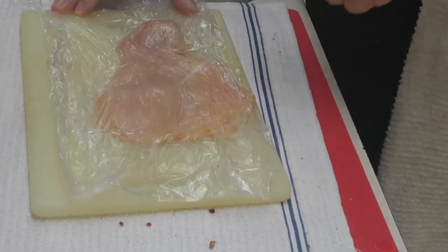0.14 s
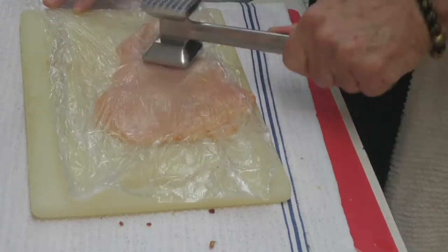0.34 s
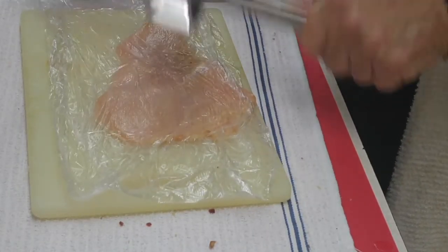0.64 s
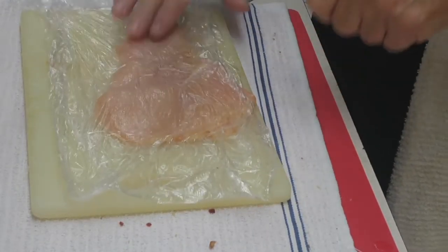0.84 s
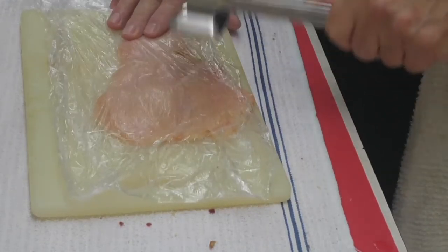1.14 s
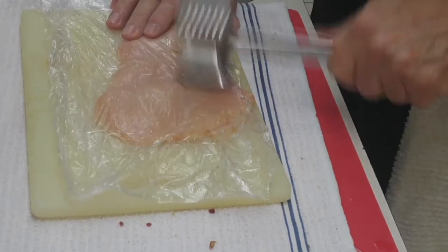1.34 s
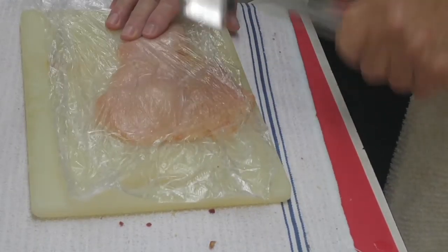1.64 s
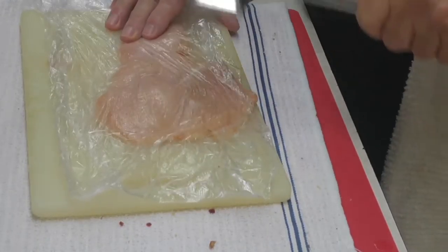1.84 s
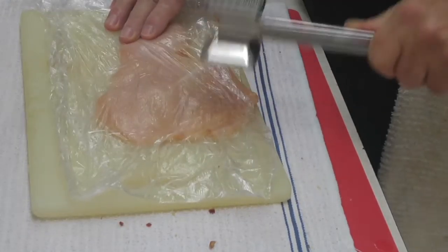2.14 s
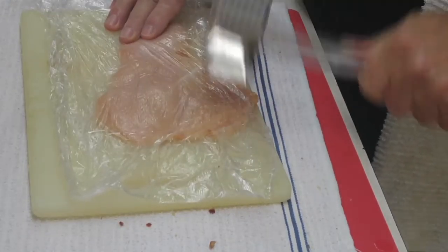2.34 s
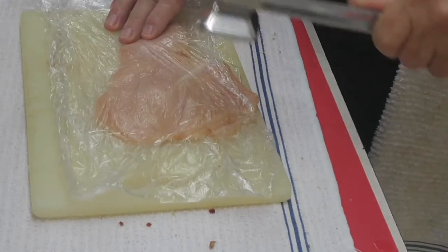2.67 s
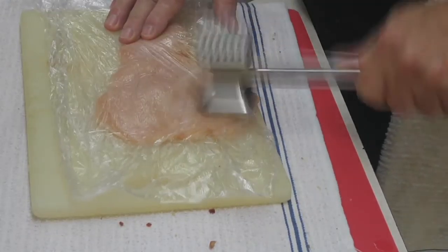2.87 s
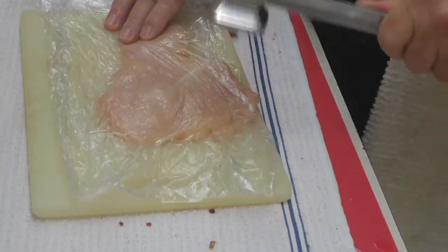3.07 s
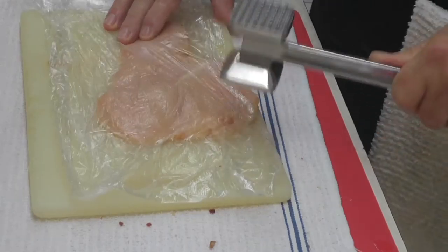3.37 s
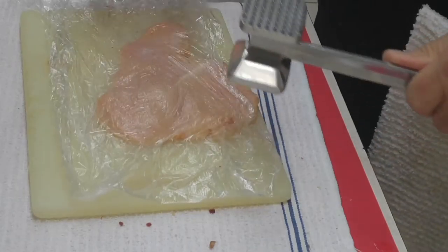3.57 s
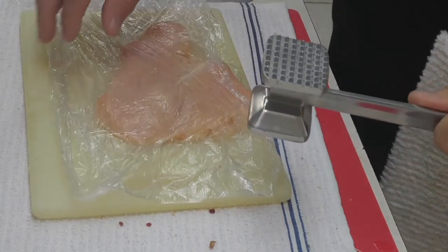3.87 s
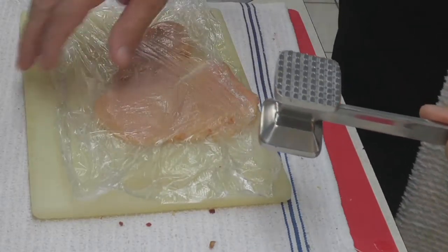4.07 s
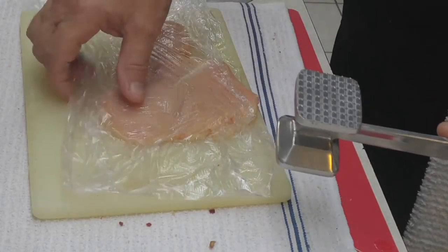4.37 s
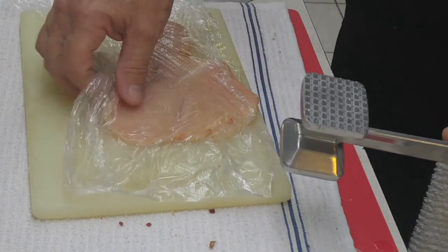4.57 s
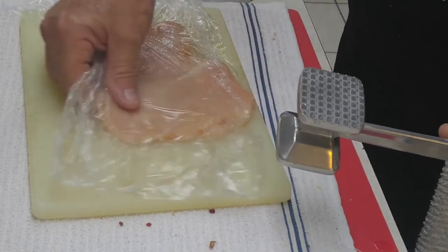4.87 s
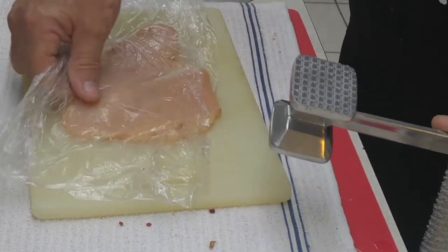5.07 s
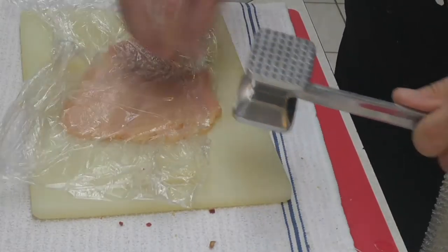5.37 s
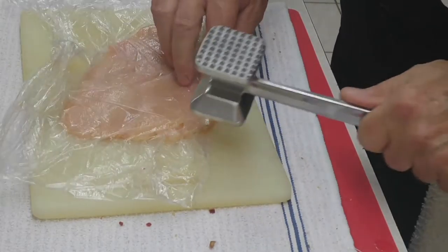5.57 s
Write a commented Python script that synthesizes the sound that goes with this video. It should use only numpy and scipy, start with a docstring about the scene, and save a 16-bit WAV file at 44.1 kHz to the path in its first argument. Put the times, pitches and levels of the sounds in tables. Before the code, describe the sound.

Close, dry-ish small-kitchen sound with a faint steady hush. The tail of an earlier blow and a soft film rustle open it. A metal mallet then hits meat under plastic film at about 0.25 and 0.6 s: loud wet slaps with a short, dull cutting-board thump. From 1.0 to 3.5 s blows continue every 0.35 s or so, softer and varied, some thin and bright, the one at 2.8 s barely a tap. Each slap leaves a sprinkle of fine ticks, and a small crackle follows about 0.08 s later as the film peels off the mallet. A fuller, hollower smack comes at 3.85 s, faint film rustle around 4.2 s, then the hardest crack at 4.23 s, limited and slightly clipped, its short tail swelling. A tiny squeak precedes a lighter blow at 4.6 s, another follows at 4.95 s, a second hard smack at 5.3 s, and a light last hit at 5.65 s.

```python
"""Pounding meat under film

A metal mallet pounds a chicken breast under plastic film on a cutting board, in a small kitchen.
Each blow is a wet slap of shaped noise, with the thump of the board as a sum of damped modes.
Sparse random ticks make the film spatter after a slap and crackle as the mallet lifts off.
Band-wise decaying noise is the room; the recorder's limiter ducks the hardest slaps, so their tail swells."""
import sys
import numpy as np
from scipy import signal
from scipy.fft import rfft, irfft
from scipy.io import wavfile
from scipy.ndimage import uniform_filter1d

SR = 44100
rng = np.random.default_rng(int(sys.argv[2]) if len(sys.argv) > 2 else 0)


def generate_wav(signal):
    """Clip the signal to [-1, 1] and save it as 16-bit WAV at the path in sys.argv[1]."""
    frames = np.transpose(np.atleast_2d(signal))
    scaled = np.clip(frames, -1, 1) * 32767
    pcm = np.round(scaled).astype(np.int16)
    wavfile.write(sys.argv[1], SR, pcm)


N = 251987
LEAD = SR // 4   # samples computed ahead of the start, so that earlier sound can ring on
SPAN = N + LEAD
TIME = (np.arange(SPAN) - LEAD) / SR
THIRDS = 250 * 2 ** (np.arange(19) / 3)   # third-octave band centres [Hz]

# mallet blows, levels relative: (time [s], slap level [dB], slap tilt [dB per octave],
# air pocket frequency [Hz], air pocket boost [dB], thump level [dB],
# time the head rests on the meat [s], lift-off crackle level [dB])
MALLET_BLOWS = [(-.11, 4, -3.5, 1020, -3, -1.5, 0.096, -28.5), (.248, 4.5, 0, 1100, 7, 2, 0.076, -20),
                (0.5976, 7.5, -2.5, 7000, 7, 3.5, 0.076, -17.5),
                (0.9818, -10.5, 4, 1600, 7.5, -2, 0.081, -30.5),
                (1.342, -10.5, .5, 2030, 1, -9.5, .089, -26), (1.7331, -6, 0, 3510, 5.5, -1.5, 0.088, -26),
                (2.0947, -6, 0, 3400, 6, -2, .092, -14.5), (2.4646, -4, -2, 4340, 7, -2.5, 0.095, -17.5),
                (2.7902, -16, 0.5, 3225, 4.5, -8, 0.086, -35),
                (3.1665, -8.5, -0.75, 6800, 8.5, 2.5, .089, -24), (3.5281, -4, 0, 1900, 2, 0.5, .079, -25),
                (3.8623, 2.5, -0.7, 900, 7, 5.5, .098, -36.5),
                (4.233, 19, -1.67, 2374, 7.5, 8.5, 0.073, -19),
                (4.5913, -0.5, -0.5, 4900, 12, -3.5, 0.08, -26.5),
                (4.9593, -2.5, 1.5, 1184, 4.5, -0.5, .085, -20), (5.297, 14, -.5, 5000, 4, 6, .082, -19.5),
                (5.6481, -5.5, 2.5, 747, 4.5, 1.5, .08, -30.5)]


def from_db(db):
    """A level in decibels is a logarithm of amplitude; this inverts it to a gain."""
    return 10 ** (np.asarray(db) / 20)


def unit(x):
    """Energy is the sum of squares; each row is normalized to an energy of one."""
    return x / np.sqrt(np.sum(x ** 2, axis=-1, keepdims=True) + 1e-20)


def at_hz(points, hz):
    """A spectrum is interpolated linearly along a logarithmic frequency axis."""
    points = np.array(points)
    return np.interp(np.log(hz), np.log(points[:, 0]), points[:, 1])


def third(x, hz):
    """Band-pass filtering isolates one third octave around its centre frequency."""
    half = 2 ** (1 / 6)
    sos = signal.butter(2, [hz / half, hz * half], "band", fs=SR, output="sos")
    return signal.sosfilt(sos, x + 1e-18)


def place(times, sounds):
    """Superposition: short sounds add linearly on the common time line."""
    out = np.zeros(SPAN + SR)
    for s, sound in zip(times, sounds):
        start = max(round(s * SR) + LEAD, 0)
        out[start:start + len(sound)] += sound
    return out[:SPAN]


def steady_noise(colour):
    """Spectral shaping: white noise weighted in frequency becomes coloured noise of rms one."""
    hz = np.maximum(np.fft.rfftfreq(SPAN, 1 / SR), 1)
    spectrum = rfft(rng.standard_normal(SPAN)) * from_db(at_hz(colour, hz))
    return np.sqrt(SPAN) * unit(irfft(spectrum, SPAN))


def ring(force, hz, t60):
    """Damped resonance: a two-pole mode answers a unit click with a decaying sine."""
    r = from_db(-60 / (t60 * SR))   # amplitude kept per sample
    w = 2 * np.pi * hz / SR
    return signal.lfilter([0, np.sin(w)], [1, -2 * r * np.cos(w), r * r], force + 1e-18)


def room_tone(level_db=-63):
    """Stationary noise: the room's hush has a fixed spectrum and a constant mean power."""
    # hush colour: (frequency [Hz], relative level [dB per Hz])
    hush_colour = [(30, 5.5), (60, 16), (110, -2.5), (320, -2), (500, -2.5), (780, 0.5), (1600, -10.5),
                   (3000, -11), (6000, -16.5), (10000, -17.5), (15500, -20)]
    return from_db(level_db) * steady_noise(hush_colour)


def rustles(swell_s=0.015, fade_s=0.031):
    """Amplitude modulation: handled film is noise that swells and fades exponentially at each peak."""
    # rustle colour: (frequency [Hz], relative level [dB per Hz])
    rustle_colour = [(290, -47.5), (500, -4.5), (739, 3), (1440, -2.5), (1640, 0), (2820, 0), (4460, -5.5),
                     (6780, -17), (14000, -39.5)]
    # film handled between blows: (time of the peak [s], level [dB])
    rustle_peaks = [(0.109, -42), (.165, -53), (.225, -50.5), (0.556, -50.5), (2.349, -59.5), (4.101, -57),
                    (4.21, -49.5)]
    envelope = 0
    for s, db in rustle_peaks:
        time_constant = np.where(TIME < s, swell_s, fade_s)
        envelope = envelope + from_db(db) * np.exp(-np.abs(TIME - s) / time_constant)
    return envelope * steady_noise(rustle_colour)


def kitchen(x, near_db=-5.5, near_t60=.085, build_s=0.0009):
    """Diffuse reverberation: each band's energy is stored and returned as exponentially decaying noise."""
    # decay of the tail: (frequency [Hz], T60 [s])
    tail_t60 = [(100, 0.81), (300, 0.25), (800, .32), (2000, 0.3), (5000, 0.29), (13000, 0.37)]
    # strength of the tail against the direct sound: (frequency [Hz], level [dB])
    tail_level = [(100, -29), (400, -8), (850, -9), (2000, -10), (5000, -8.5), (8000, -16.5),
                  (13000, -20.5)]

    def store(power, seconds):
        """First-order energy balance: a leaky store fills and empties with one time constant."""
        r = np.exp(-1 / (seconds * SR))
        return signal.lfilter([1 - r], [1, -r], power)

    white = rng.standard_normal((2, SPAN))
    bands = np.concatenate([THIRDS[2:6] / 4, THIRDS])   # four more below 250 Hz
    out = 0
    for k, hz in enumerate(bands):
        power = third(x, hz) ** 2
        # ln(1e6) turns a 60 dB decay time into an energy time constant
        cupboards = store(power, near_t60 / np.log(1e6)) * from_db(near_db) ** 2
        tail = store(power, at_hz(tail_t60, hz) / np.log(1e6)) * from_db(at_hz(tail_level, hz)) ** 2
        envelope = np.sqrt(SPAN * store(cupboards + tail, build_s))
        out = out + envelope * unit(third(white[k % 2], hz))
    return out


def squeaks():
    """Narrow-band resonance: stretched film slips under the fingers and sings briefly around one pitch."""
    # squeaks: (time of the peak [s], time from peak to 1/e [s], frequency [Hz], level [dB])
    film_squeaks = [(4.15, 0.086, 8980, -69.5), (4.205, .028, 2900, -57), (4.572, .002, 3800, -37.5)]
    out = 0
    for s, length, hz, db in film_squeaks:
        resonance = ring(rng.standard_normal(SPAN), hz, length / 4)
        singing = unit(third(resonance, hz)) * np.sqrt(SPAN)
        out = out + from_db(db) * np.exp(-((TIME - s) / length) ** 2) * singing
    return out


def spatter(spatter_db=-5.0, ticks_per_s=480.0, fade_s=0.02, wait_s=0.004):
    """Decaying impulse process: wet film creases after each slap in ever rarer, weaker bright ticks."""
    s, level_db, *_ = np.array(MALLET_BLOWS).T
    t = np.arange(SR // 8) / SR
    fade = np.exp(-t / fade_s)
    shape = (len(s), len(t))
    strikes = rng.random(shape) < ticks_per_s * fade / SR
    ticks = rng.standard_normal(shape) * strikes * np.sqrt(fade)
    ticks = place(s + wait_s, ticks * from_db(level_db + spatter_db)[:, None])
    return signal.sosfilt(signal.butter(1, [3000, 8000], "band", fs=SR, output="sos"), ticks)


def lifts(peel_s=0.0093, peel_db=-17.5, tear_s=.002, snap_s=0.0046, ticks_per_s=2500.0, settle_db=-27.5):
    """Random impulses: film peels in swelling ticks and snaps free; the meat drops back on the board."""
    # crackle colour: (frequency [Hz], level [dB per third octave])
    crackle_colour = [(250, -34), (600, -19), (1000, -23), (2000, -27.5), (4000, -23), (8000, -20),
                      (12000, -23), (16000, -23.5)]
    blow_s, *_, thump_db, rest_s, level_db = np.array(MALLET_BLOWS).T
    s = blow_s + rest_s
    t = np.arange(-SR // 30, SR // 20) / SR   # zero at the snap
    peel = from_db(peel_db) * np.exp(-np.abs(t) / peel_s)
    snap = np.exp(-np.abs(t) / np.where(t < 0, tear_s, snap_s))
    shape = (len(s), len(t))
    strikes = rng.random(shape) < ticks_per_s / SR
    ticks = (peel + snap) * rng.standard_normal(shape) * strikes
    crackle = 0
    for k, hz in enumerate(THIRDS):
        crackle = crackle + (-1) ** k * from_db(at_hz(crackle_colour, hz)) * unit(third(ticks, hz))
    crackle = crackle * from_db(level_db)[:, None] * np.sqrt(snap_s * SR)
    settling = board(s, thump_db + settle_db, contact_s=.0001)
    return place(s + t[0], crackle) + settling


def board(times, level_db, contact_s, hardness_db=0, spread_db=4.0):
    """Modal synthesis: each spot excites the modes differently; a long, soft contact spares the high ones."""
    # board on the counter: (mode frequency [Hz], level [dB])
    board_modes = [(82, -21.5), (100, -19.5), (142, -21.5), (180, -20), (232, -31), (270, -27.5),
                   (315, -21.5), (380, -35), (470, -33), (615, -31.5), (745, -30), (860, -21.5), (935, -26),
                   (1067, -37), (1205, -32.5), (1322, -29.5)]
    board_t60, towel_t60 = .11, .09   # s
    t = np.arange(SR // 50) / SR
    push = t * np.exp(-t / contact_s)
    push /= push.sum()
    spots_db = spread_db * rng.standard_normal((len(board_modes), len(times)))
    out = 0
    for k, (hz, db) in enumerate(board_modes):
        tilt_db = hardness_db * np.log2(min(hz, 400) / 130)   # hardness in dB per octave
        strengths = from_db(level_db + db + spots_db[k] + tilt_db)
        t60 = towel_t60 if k < 3 else board_t60   # the towel underneath damps the three bouncing modes
        out = out + (-1) ** k * ring(place(times, strengths[:, None] * push), hz, t60)
    return out


def thumps(touch_s=.001, touch_db=-5.0, sink_s=.009, sink_db=2.0):
    """Two-stage impact: first touch knocks the board, then the meat, squeezed flat, shoves it again."""
    s, *_, thump_db, _, _ = np.array(MALLET_BLOWS).T
    hardness_db = 1.96 + 0.2 * thump_db   # a heavier thump is a harder contact [dB per octave]
    touch = board(s + touch_s, thump_db + touch_db, contact_s=.00005, hardness_db=hardness_db)
    sink = board(s + sink_s, thump_db + sink_db, contact_s=.00022, hardness_db=hardness_db)
    return touch + sink


def slaps(rise_s=0.0013, squeeze_s=0.0062, pocket_octaves=0.69):
    """Turbulent burst: air and juice escape as brief noise, coloured by the trapped air pocket."""
    # slap colour: (frequency [Hz], level [dB per third octave])
    slap_colour = [(250, -32), (450, -40), (700, -14.5), (880, -17), (1120, -19.5), (1450, -14.5),
                   (2400, -18.5), (4000, -20.5), (6300, -21.5), (8000, -21.5), (10200, -32.5), (13000, -26),
                   (16000, -85)]
    s, level_db, tilt_db, pocket_hz, pocket_db, *_ = np.array(MALLET_BLOWS).T
    t = np.arange(SR // 20) / SR
    squeeze = (1 - np.exp(-(t / rise_s) ** 2)) * np.exp(-(t / squeeze_s) ** 4)
    bursts = rng.standard_normal((len(s), 2, len(t))) * squeeze
    out = 0
    for k, hz in enumerate(THIRDS):
        pocket = pocket_db * np.exp(-(np.log2(hz / pocket_hz) / pocket_octaves) ** 2)
        tilt = tilt_db * np.log2(max(hz, 700) / 2500)
        gain = from_db(level_db + at_hz(slap_colour, hz) + tilt + pocket)
        out = out + gain[:, None] * unit(third(bursts[:, k % 2], hz))
    return place(s, out * np.sqrt(squeeze_s * SR))


def scene(board_room_db=-3.0):
    """Superposition: direct sounds and their reverberation add to faint rustles and the room tone."""
    film = slaps() + spatter() + lifts() + squeaks()
    thud = thumps()
    reverberation = kitchen(film + from_db(board_room_db) * thud)   # the board radiates poorly into the room
    return (film + thud + reverberation + rustles() + room_tone())[None, LEAD:]


def limiter(x, threshold_db=-6.0, release_s=0.024, attack_s=0.000075):
    """Dynamic gain control: loud sound cuts the gain almost at once; it recovers, quickly at first."""
    power = uniform_filter1d(x ** 2, size=88, axis=-1)   # 2 ms mean
    level_db = 10 * np.log10(np.maximum(power, 1e-12))
    excess_db = np.maximum(level_db - threshold_db, 1e-9)
    # a running maximum in the log domain holds each peak and lets it decay exponentially
    recovery = np.arange(N) / SR / release_s
    duck_db = np.exp(np.maximum.accumulate(np.log(excess_db) + recovery, axis=-1) - recovery)
    r = np.exp(-1 / (attack_s * SR))
    return x * from_db(-signal.lfilter([1 - r], [1, -r], duck_db))


def record(dry, bass_cut_hz=42.0, dip_hz=504.0, dip_q=2.8, cutoff_hz=15850):
    """Recording chain: a small microphone thins the bass and notches the low mids;
    the recorder limits loud sound, rounds its peaks and stops sharply at the top of its band."""
    x = signal.sosfilt(signal.butter(2, bass_cut_hz, "high", fs=SR, output="sos"), dry)
    x = signal.lfilter(*signal.iirnotch(dip_hz, dip_q, fs=SR), x)
    x = limiter(x)
    x = x / (1 + (x / .86) ** 6) ** (1 / 6)   # saturation rounds the peaks
    return signal.sosfilt(signal.ellip(10, .1, 80, cutoff_hz, fs=SR, output="sos"), x)


dry = scene()
out = record(dry)
generate_wav(out)
```